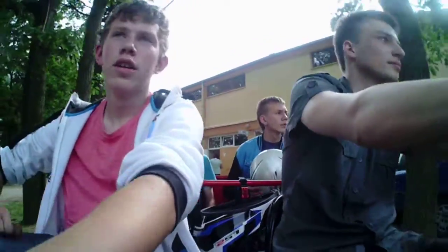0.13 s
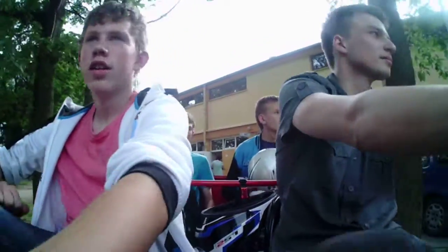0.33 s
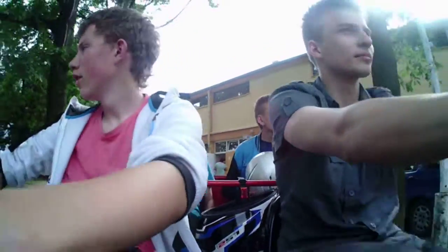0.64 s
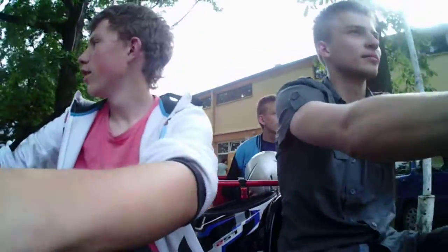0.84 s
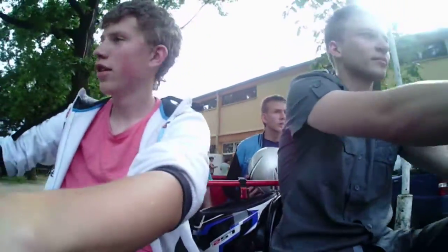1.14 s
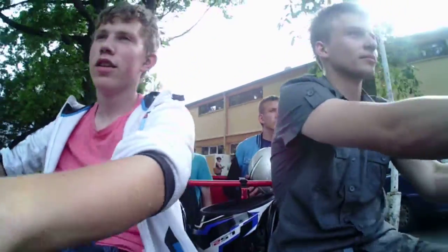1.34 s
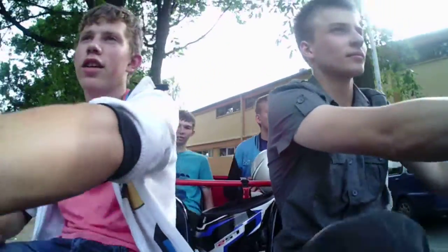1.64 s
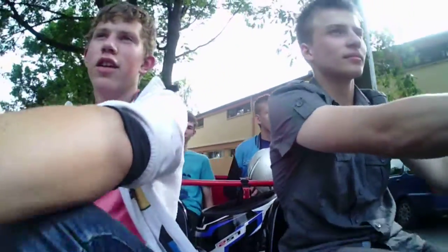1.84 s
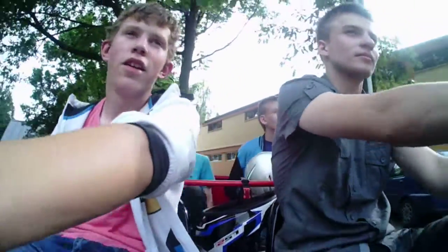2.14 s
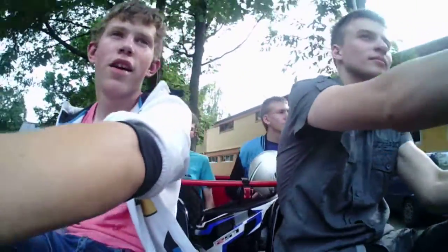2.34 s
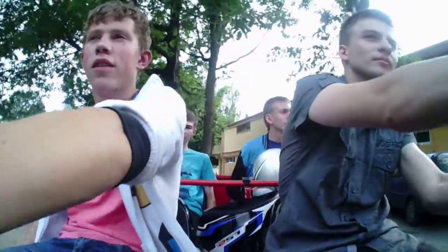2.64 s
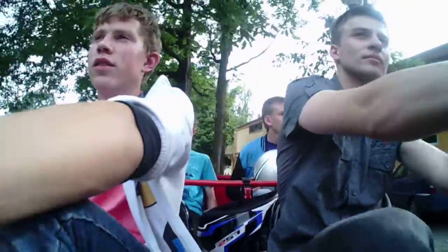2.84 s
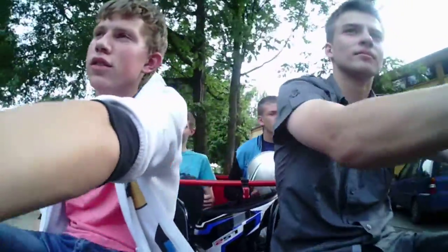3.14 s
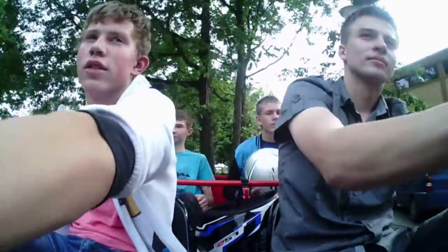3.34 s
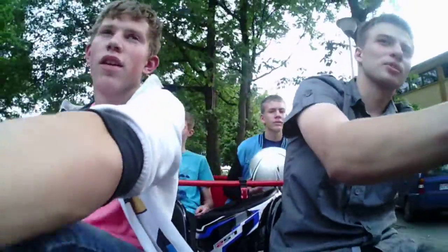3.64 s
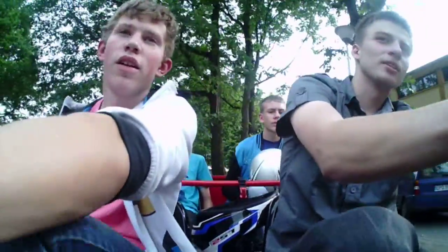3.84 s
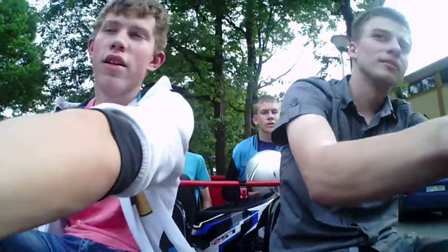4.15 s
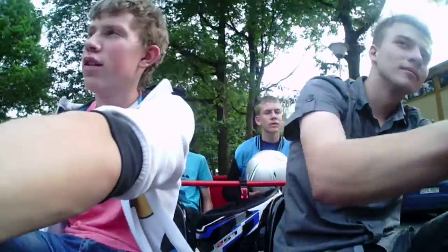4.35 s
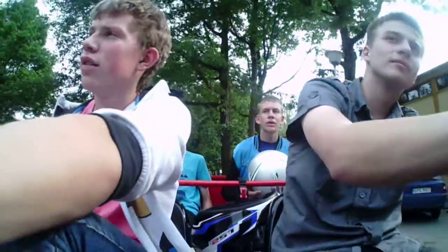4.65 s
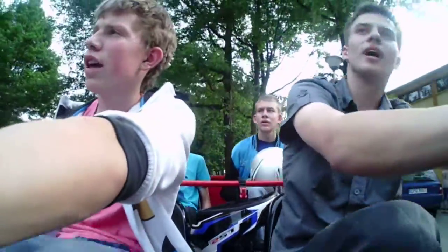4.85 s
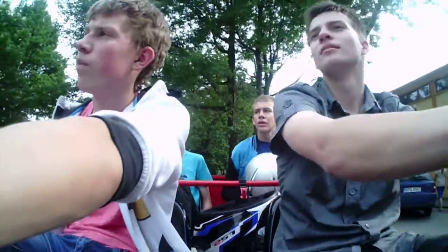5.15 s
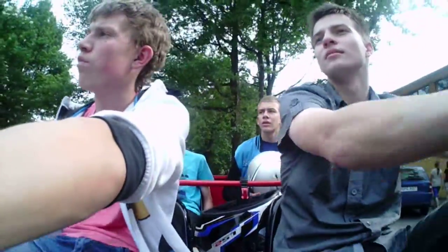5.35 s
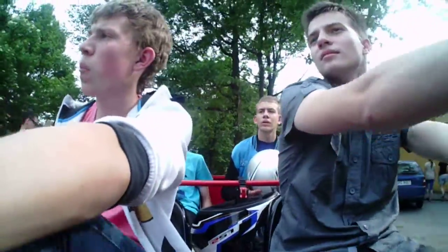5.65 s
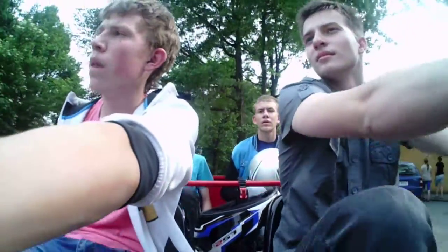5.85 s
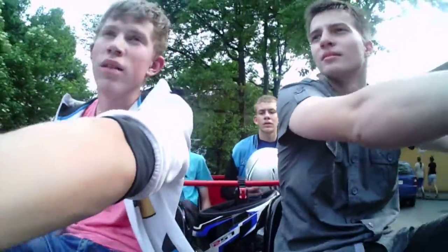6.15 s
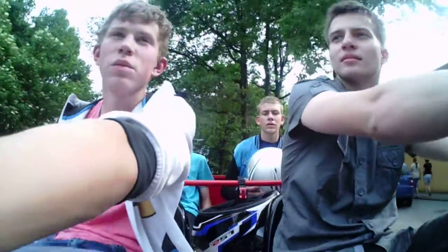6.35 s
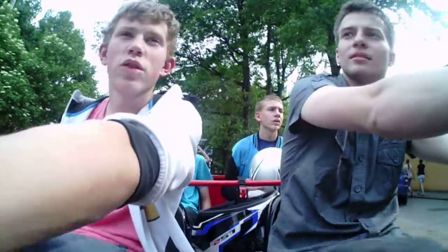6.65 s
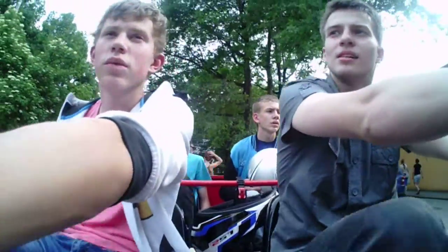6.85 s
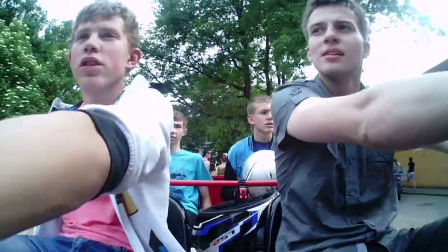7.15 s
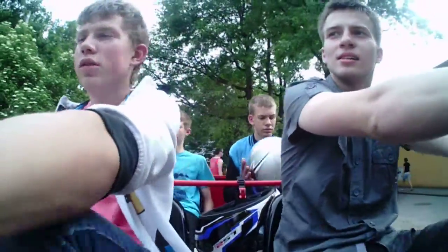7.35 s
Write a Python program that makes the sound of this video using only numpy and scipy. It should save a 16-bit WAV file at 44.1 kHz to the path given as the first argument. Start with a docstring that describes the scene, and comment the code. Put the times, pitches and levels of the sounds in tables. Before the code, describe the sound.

Tyres drum steadily on asphalt as a metal cart frame chatters, bangs once loudly, then clanks and squeaks now and then.

```python
"""Tyres rumble over rough asphalt and shake the frame of an open multi-seat cart. The frame is a resonator:
rolling, chattering joints and single thuds, knocks and clanks all excite the same modes, heard through a small
camera riding on it. One hard bang overloads the microphone. Beneath this the camera's mount shudders at a low
pitch, loose bits rattle, a dry joint chirps now and then, air brushes the microphone and the camera ticks
faintly."""
import sys
import numpy as np
from scipy import signal
from scipy.fft import rfft, irfft, next_fast_len
from scipy.io import wavfile
from scipy.ndimage import map_coordinates

SR = 44100
rng = np.random.default_rng(int(sys.argv[2]) if len(sys.argv) > 2 else 0)


def digitize_waveform(pressure):
    """Quantize a signal to 16-bit integers and store it at the path in sys.argv[1].

    Rows of a 2-D input are taken as channels; values are limited to [-1, 1].
    """
    field = np.atleast_2d(pressure).T
    bounded = np.clip(field, -1, 1)
    quanta = np.round(bounded * 32767).astype(np.int16)
    wavfile.write(sys.argv[1], SR, quanta)


N = 330309
TIME = np.arange(N) / SR
SIZE = next_fast_len(N + SR // 2, real=True)
HZ = np.fft.rfftfreq(SIZE, 1 / SR)
MIC_HZ = 5370  # upper band edge of the microphone


def rolling(rumble_db=2.5, grit_db=-2.5, chatter_db=-5):
    """Forced vibration: the tyres drum on the asphalt, and the shaking keeps every joint chattering."""
    # how hard the road shakes the cart: t/s, level/dB
    road = [(0.0, -28.5), (0.23, -35.5), (2.13, -35), (2.8, -36.5), (3.4, -36), (4.63, -36.5), (5.44, -33),
            (5.59, -31), (5.78, -35.5), (6.32, -35), (6.55, -34.5), (7.15, -34.5), (7.32, -40), (7.49, -36)]
    road_db, = curves(road)
    mean_db = road_db.mean()
    extra_db = road_db - mean_db
    soft, medium, hard = frame(damping=1.0)
    bumps = wobble(22)  # unevenness of the road, felt by all parts
    tyre_force = rng.standard_normal(N) * amp(2.0 * bumps)
    grit_force = grains(2500, spread_db=0.5) * amp(0.85 * bumps + 0.37 * wobble(45))
    joint_force = grains(2200, spread_db=1.0) * amp(1.6 * bumps + 0.77 * wobble(40))
    # each layer grows with the shaking at its own slope
    rumble = amp(rumble_db + 0.6 * extra_db) * unit(filtered(tyre_force, soft))
    grit = amp(grit_db + extra_db) * unit(filtered(grit_force, medium))
    chatter = amp(chatter_db + 0.75 * extra_db) * unit(filtered(joint_force, hard))
    return amp(mean_db) * (rumble + grit + chatter)


def frame(damping, thud_hz=477, clank_hz=1739):
    """Modal response to soft, medium and hard contacts: the harder the contact, the higher the band."""
    # resonances of the frame at the camera: f/Hz, bandwidth/Hz at damping 1, relative level/dB
    modes = [(132, 37, -9.5), (169, 14, -6), (210.6, 35, -6.5), (276.9, 22.5, -0.5), (341, 47, -17),
             (465, 70, -24.5), (620, 43.6, -13.5), (801, 42, -19), (898.7, 49, -7.5), (1047.3, 40, -8.5),
             (1165, 66, -12.5), (1277, 51, -14.5), (1369, 44, -18.5), (1648, 57.6, -24), (2095.6, 81.5, -7),
             (2272, 120, -16), (2496, 150, -22.5), (2797, 140, -15.5), (2940, 13, -13), (3038, 140, -20),
             (3394, 62, -21.5), (3640, 84, -27.5), (3782, 100, -26.5), (4930, 2000, -47.5)]
    power = sum(amp(db) ** 2 / (1 + 1.8 * ((HZ - hz) / (width * damping)) ** 2) ** 2
                for hz, width, db in modes)
    gain = np.sqrt(power) * below(MIC_HZ, order=20) * (1 - below(93, order=3))
    low, not_high = below(thud_hz, order=6), below(clank_hz, order=8)
    return [causal(gain * band) for band in (low, not_high * (1 - low), 1 - not_high)]


def jolt(rings, start, contact, own_hz, levels, strike, settle_s, linger_s, linger_db, own_db, own_q):
    """Convolution: a part strikes, buzzes and settles; its force drives the low, middle and high rings."""
    t = np.arange(SR // 4) / SR
    after = np.maximum(t - contact, 0)
    buzz = np.exp(-0.6 * t / contact - after / settle_s) + amp(linger_db) * np.exp(-after / linger_s)
    force = buzz * rng.standard_normal(len(t))
    force[0] += strike  # the first touch is one clean impulse
    own = signal.lfilter(*signal.iirpeak(own_hz, own_q, SR), force)  # the part's own resonance
    bite = signal.lfilter(*signal.iirpeak(3600, 4.0, SR), force)  # bare steel is brighter than tyre grit
    force = force + amp(own_db) * own + amp(1) * bite
    out = np.zeros(N + SR)
    for ring, db in zip(rings, levels):
        blow = signal.fftconvolve(force, ring)[:len(t)]
        attack = blow[:int((contact + 0.012) * SR)]
        out[max(round(start * SR), 0):][:len(t)] += amp(db) * blow / np.std(attack)
    return out[:N]


def thuds(rings, middle_db=-15, high_db=-24):
    """Cushioned impact: the tyres soften the blow, so mainly the low modes ring."""
    # a wheel drops into a dip: t/s, contact time/s, relative level/dB, f/Hz
    dips = [(0.598, 0.038, -20, 239.5), (0.72, 0.019, -29, 273), (2.493, 0.013, -29.5, 300),
            (3.379, 0.023, -27.5, 278), (3.47, 0.031, -22, 273), (4.88, 0.067, -21.5, 215),
            (5.305, 0.016, -24, 282), (6.045, 0.027, -27.5, 206), (6.2, 0.03, -29.5, 290)]
    return sum(jolt(rings, start, contact, hz, (db, db + middle_db, db + high_db), strike=22.0,
                    settle_s=0.007, linger_s=0.04, linger_db=-24, own_db=10.0, own_q=9.9)
               for start, contact, db, hz in dips)


def knocks(rings, high_db=-17):
    """Blunt impact: the middle modes of the chassis ring hollow, with a thump beneath."""
    # chassis knocks, the first three being the hard bang and its rebounds:
    # t/s, contact time/s, relative level/dB, f/Hz, thump re knock/dB
    blows = [(0.43, 0.0073, -4, 1160, -15), (0.452, 0.0097, -20.5, 1020, -6.5),
             (0.482, 0.0064, -20, 1010, -4), (1.293, 0.023, -20.5, 1150, -6.5),
             (1.87, 0.011, -19.5, 1090, 2), (3.457, 0.021, -27.5, 1150, 4.5),
             (5.017, 0.026, -24.5, 1120, -3), (5.351, 0.03, -28.5, 630, -0.5), (5.442, 0.02, -29, 630, 0),
             (6.294, 0.037, -29, 660, 1)]
    return sum(jolt(rings, start, contact, hz, (db + thump_db, db, db + high_db), strike=4.3,
                    settle_s=0.007, linger_s=0.037, linger_db=-23.5, own_db=12.0, own_q=3.4)
               for start, contact, db, hz, thump_db in blows)


def clanks(rings, low_db=-4.5):
    """Hard impact: steel on steel excites the high modes; a heavier part moves the lower ones too."""
    # loose steel parts strike, the loudest opening the hard bang:
    # t/s, contact time/s, relative level/dB, f/Hz, body re clank/dB
    blows = [(0.002, 0.015, -29, 2070, -4.5), (0.042, 0.045, -24.5, 2100, -8.5),
             (0.132, 0.019, -23.5, 2100, -2), (0.425, 0.016, -9.5, 3050, -2.5),
             (0.449, 0.0098, -16, 3750, -11), (0.509, 0.06, -31, 3180, 1), (0.896, 0.027, -28, 1950, -0.5),
             (1.243, 0.04, -32, 3300, -12), (1.293, 0.018, -21.5, 2090, -3.5),
             (1.746, 0.014, -29, 2870, -6), (2.08, 0.0088, -34, 2830, 0), (3.204, 0.011, -36, 2070, -2),
             (3.512, 0.025, -29.5, 2100, -4.5), (3.565, 0.016, -28, 3380, -16),
             (3.851, 0.012, -25.5, 3110, -3), (3.922, 0.006, -25, 3830, -3.5),
             (4.845, 0.026, -25, 1270, -1), (5.351, 0.012, -26.5, 2100, -14.5),
             (5.41, 0.012, -22.5, 3160, -15), (5.495, 0.037, -32, 1150, 0.5),
             (5.782, 0.015, -20, 3050, -6.5), (5.83, 0.014, -25, 3020, -7.5),
             (5.939, 0.014, -24, 3010, -5.5), (6.428, 0.026, -28, 3520, -7),
             (6.589, 0.016, -21.5, 3040, -13), (6.753, 0.028, -27.5, 2870, -4.5),
             (6.918, 0.028, -26, 2450, -3), (7.265, 0.046, -29.5, 1395, 0), (7.337, 0.011, -24, 2070, -4)]
    return sum(jolt(rings, start, contact, hz, (db + body_db + low_db, db + body_db, db), strike=4.0,
                    settle_s=0.0088, linger_s=0.053, linger_db=-18.5, own_db=4.0, own_q=8.6)
               for start, contact, db, hz, body_db in blows)


def shudder(hz=44.3, waver_hz=1.3, flutter_db=1.1):
    """Resonance: the camera's mount hums at a low pitch, swelling and fading as the road feeds it."""
    # strength of the mode: t/s, level/dB
    swells = [(0.0, -52), (0.25, -37), (0.52, -42.5), (0.96, -36), (1.0, -48), (1.21, -32.5), (1.81, -37),
              (1.96, -31), (2.33, -36.5), (2.52, -31), (2.94, -39), (3.21, -28.5), (3.42, -33), (3.52, -54),
              (3.59, -36), (4.55, -36), (4.63, -46.5), (4.71, -33.5), (5.03, -36.5), (5.07, -43),
              (5.51, -31.5), (5.74, -42), (6.07, -37), (6.13, -41.5), (6.8, -28.5), (7.05, -43.5),
              (7.26, -32), (7.49, -37.5)]
    level_db, = curves(swells)
    phase = 2 * np.pi * np.cumsum(hz + waver_hz * wobble(28)) / SR
    return amp(level_db + flutter_db * wobble(18)) * unit(np.sin(phase))


def rattles(per_second=28, level_db=-44, spread_db=2.8, settle_s=0.0095):
    """Poisson process: small loose bits tap the frame at independent, random times."""
    _, medium, hard = frame(damping=1.2)
    hits = rng.random(N) < per_second / SR
    taps = hits * amp(spread_db * np.clip(rng.standard_normal(N), -2, 2))
    buzz = signal.lfilter([1], [1, -np.exp(-1 / (settle_s * SR))], taps)
    return amp(level_db) * unit(filtered(buzz * rng.standard_normal(N), hard + 0.51 * medium))


def chirps(flutter_db=2.5):
    """Stick-slip friction: a dry joint grips and lets go in short, scraping squeaks."""
    # squeaks of the joint: t/s, duration/s, f/Hz, level/dB
    squeaks = [(2.3, 0.02, 3690, -39.5), (3.066, 0.031, 3400, -41.5), (3.925, 0.042, 3770, -38.5),
               (4.006, 0.025, 3600, -43.5), (5.194, 0.074, 2800, -34), (5.262, 0.09, 2985, -33),
               (5.532, .035, 3710, -44), (6.371, 0.026, 3660, -39.5), (6.425, 0.028, 3340, -31)]
    out = np.zeros(N)
    waver = 1 + 0.026 * wobble(700)
    grip = amp(flutter_db * wobble(180))
    for start, length, hz, db in squeaks:
        on = slice(round(start * SR), round((start + length) * SR))
        phase = 2 * np.pi * np.cumsum(hz * waver[on]) / SR
        tone = unit(grip[on] * np.sin(phase))
        out[on] += amp(db) * tone * signal.windows.tukey(len(tone), 0.5)
    return out


def air(level_db=-52.5, gust_db=0.5):
    """Flow noise: the light wind of the ride flutters on the microphone."""
    # spectrum of the wind: f/Hz, relative spectral level/dB
    spectrum = [(20, -8.5), (70, 2.5), (150, -0.5), (400, -14.5), (1500, -23), (4000, -23.5), (5400, -25),
                (6300, -40)]
    hz, db = np.transpose(spectrum)
    colour = amp(np.interp(np.log(HZ + 1), np.log(hz), db)) * below(MIC_HZ, order=24)
    return amp(level_db + gust_db * wobble(5.5)) * unit(filtered(rng.standard_normal(N), colour))


def ticking(rate_hz=57.6, level_db=-69):
    """Periodic impulse train: a faint electrical ticking in the camera."""
    pulses = np.diff(np.floor(TIME * rate_hz), prepend=0)
    band = below(MIC_HZ, order=20) * (1 - below(1300, order=2))
    return amp(level_db) * unit(filtered(pulses, band))


def grains(per_second, spread_db):
    """Shot noise: tiny impacts at random times and of random sizes, rms 1."""
    sizes = rng.standard_normal(N) * amp(spread_db * rng.standard_normal(N))
    return unit(sizes * (rng.random(N) < per_second / SR))


def wobble(rate):
    """Random modulation: a smooth curve through rate knots a second."""
    return map_coordinates(rng.standard_normal(int(N * rate / SR) + 4), [TIME * rate])


def curves(rows):
    """Linear interpolation: one value per sample for each column after the time."""
    times, *columns = np.transpose(rows)
    return [np.interp(TIME, times, column) for column in columns]


def causal(gain):
    """Minimum phase: a response of this shape that rings only once struck and keeps white noise's power."""
    cepstrum = irfft(np.log(np.maximum(unit(gain), 1e-5)), SIZE)
    cepstrum[1:SIZE // 2] *= 2
    cepstrum[SIZE // 2 + 1:] = 0
    return np.exp(rfft(cepstrum))


def below(edge_hz, order):
    """Gain of a maximally flat low-pass."""
    return 1 / np.sqrt(1 + (HZ / edge_hz) ** (2 * order))


def filtered(x, response):
    """Linear filtering: the spectrum of x times a frequency response."""
    return irfft(rfft(x, SIZE) * response, SIZE)[:N]


def amp(db):
    """Decibels to amplitude ratio."""
    return 10 ** (np.asarray(db) / 20)


def unit(x):
    """Normalisation to rms 1."""
    return x / np.sqrt(np.mean(x ** 2) + 1e-20)


def scene():
    """Superposition: all sources add at the one microphone, with no room around it."""
    # impulse responses of the frame; a blow widens its resonances
    rings = [irfft(response, SIZE)[:SR // 8] for response in frame(damping=1.13)]
    blows = thuds(rings) + knocks(rings) + clanks(rings)
    return (rolling() + amp(-0.5) * blows + rattles() + shudder() + chirps() + air() + ticking())[None]


def record(dry, ceiling=0.7, top_hz=16200):
    """Saturation: the input clips on the hardest bang, and a low-pass limits the band."""
    clipped = np.clip(dry, -ceiling, ceiling)
    return signal.sosfiltfilt(signal.butter(12, top_hz, fs=SR, output="sos"), clipped)


dry = scene()
out = record(dry)
digitize_waveform(out)
```